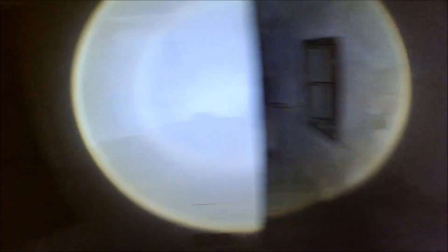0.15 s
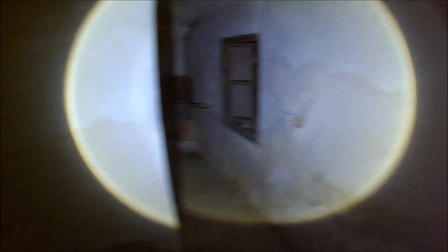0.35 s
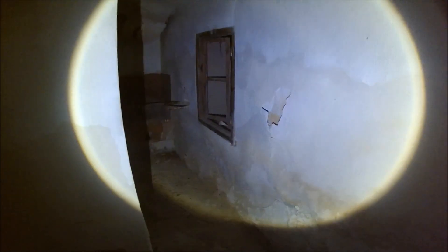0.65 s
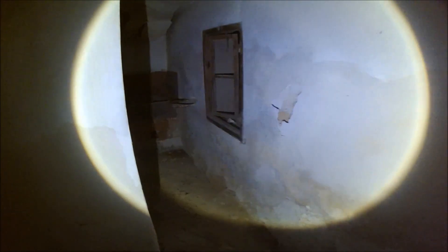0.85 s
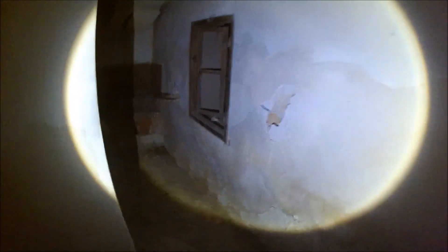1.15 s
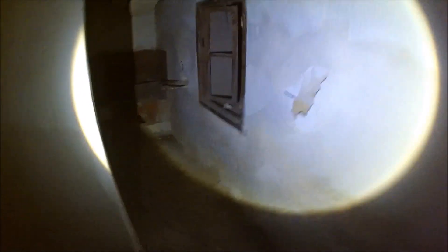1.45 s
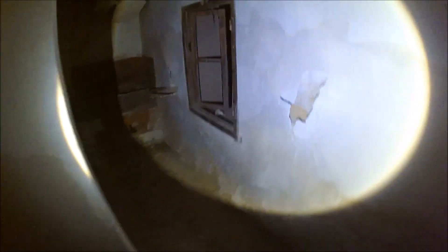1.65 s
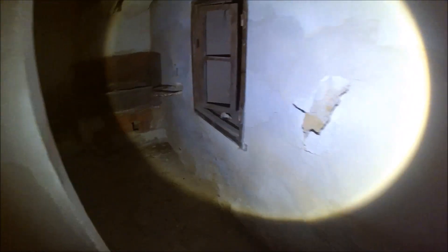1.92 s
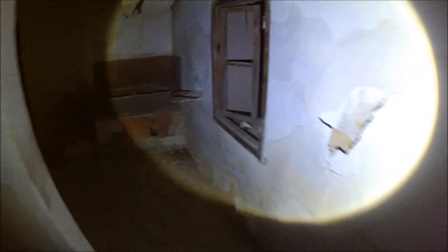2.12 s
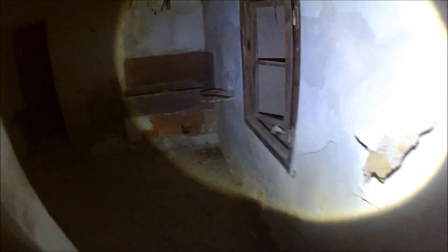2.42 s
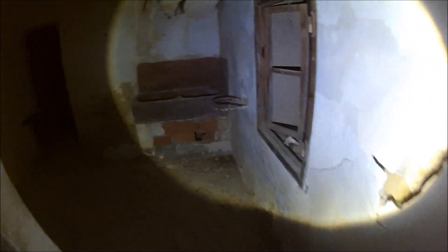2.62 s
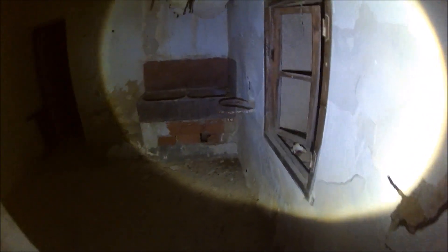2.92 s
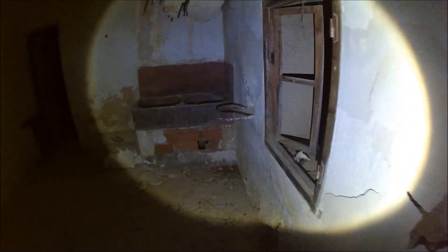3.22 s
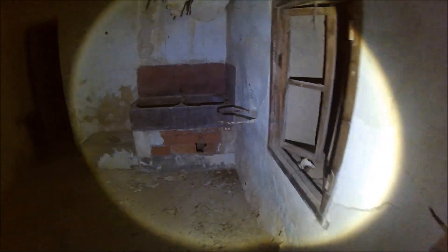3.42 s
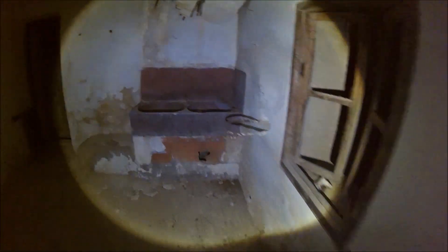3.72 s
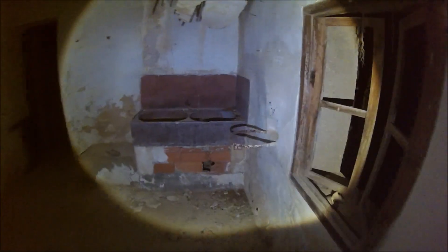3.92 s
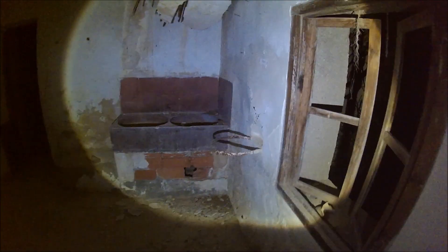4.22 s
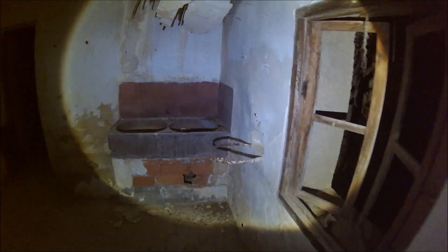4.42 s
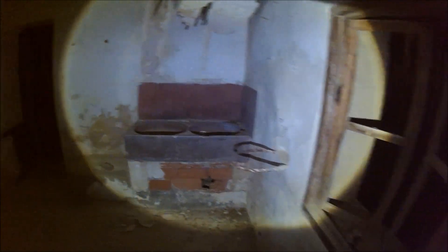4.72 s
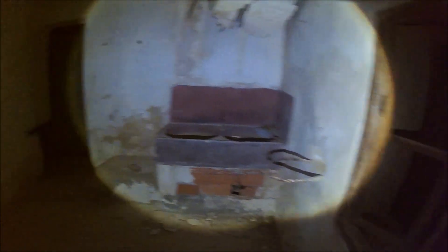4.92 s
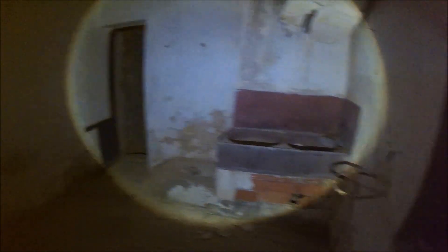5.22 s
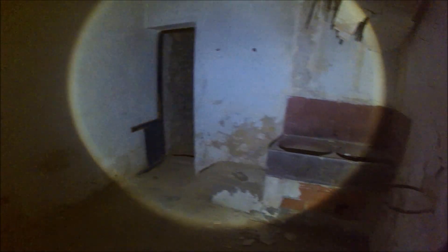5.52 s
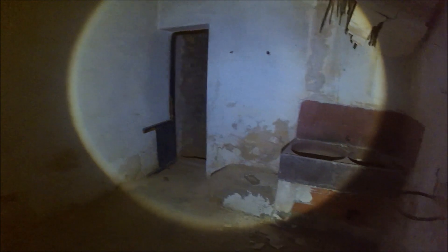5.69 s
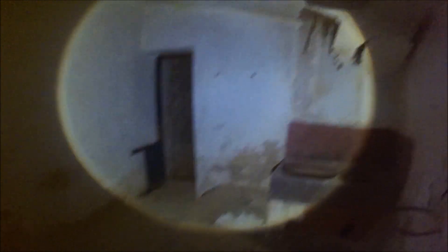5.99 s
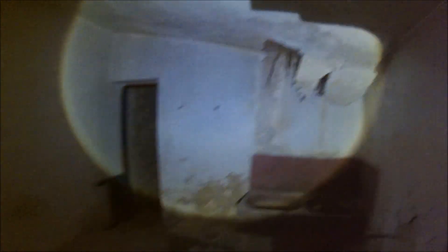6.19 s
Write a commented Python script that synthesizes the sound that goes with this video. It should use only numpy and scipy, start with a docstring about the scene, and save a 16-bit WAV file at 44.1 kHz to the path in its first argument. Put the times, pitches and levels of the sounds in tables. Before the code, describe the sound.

Through a thin nasal microphone, chips snap and grit drags under cautious shoes indoors, after a sharp, close click of handheld plastic.

```python
"""Careful steps over plaster rubble

Someone walks slowly in a small bare room, heard through a thin, nasal microphone.
Chips ring for a few cycles as they snap; grains of filtered noise make the soles drag and crunch.
Dull noise and floor tones make the thuds, and fading random echoes make the walls answer briefly.
Plastic in the hand clicks, loud and dry, and later once more, softly. Faint rustle, hiss and a thin whine lie below."""
import sys
import numpy as np
from scipy import signal
from scipy.fft import rfft, irfft
from scipy.io import wavfile

SR = 44100
rng = np.random.default_rng(int(sys.argv[2]) if len(sys.argv) > 2 else 0)


def inscribe(sig):
    """Save sig as 16-bit PCM at rate SR to the path in sys.argv[1].

    A 1-D sig is mono; a 2-D sig holds one channel per row.
    Samples are clipped to [-1, 1] before scaling.
    """
    pcm = np.round(np.clip(np.atleast_2d(sig).T, -1, 1) * 32767)
    wavfile.write(sys.argv[1], SR, pcm.astype(np.int16))


N = 280035
TIME = np.arange(N) / SR   # seconds

# hiss of the electronics, its tone colour: (frequency [Hz], relative level [dB])
HISS_COLOUR = [(40, 3.5), (500, -15.5), (4500, -8.5), (6000, -18), (7100, -14.5), (8100, -18), (9500, -8),
               (11000, -3), (12500, -6), (14500, -2.5), (16000, -6.5)]
HISS_DB = -85
WHINE_HZ, WHINE_DB = 15714, -98
# microphone behind its small port: (frequency [Hz], gain [dB])
MICROPHONE_RESPONSE = [(40, -38.5), (180, -23), (500, -16), (750, -12), (1080, -8), (1330, 1.03),
                       (1620, -0.2), (1950, 3.5), (2400, -3.5), (2850, -1.5), (3300, -6), (4200, -13.5),
                       (5200, -22), (5900, -42.5), (7200, -40), (8100, -43.5), (10500, -25.5), (15500, -38)]
CUTOFF_HZ = 15900

# how long echoes take to fall by 60 dB: (frequency [Hz], fading time [s])
ROOM_FADING = [(150, 0.58), (1400, 0.37), (3000, 0.19), (10000, 0.27)]
# the first reflections are separate, then they crowd together
ECHOES_PER_S, ECHO_DOUBLING_S = 2800, 0.025

# rustle of clothes and dust as the walker moves, before its swing is reduced: (time [s], level [dB])
RUSTLE_LEVELS = [(0.0, -58.5), (0.41, -62.5), (0.99, -56.5), (1.17, -47.5), (1.33, -46.5), (1.54, -61.5),
                 (1.84, -60.5), (2.03, -51), (2.35, -61), (3.08, -65.5), (3.82, -50.5), (4.17, -66.5),
                 (4.85, -59.5), (5.62, -67.5), (6.07, -64), (6.35, -65.5)]
RUSTLE_REST_DB, RUSTLE_SWING = -65, 0.45   # level between steps; share of the swing that is kept

# weight landing on the floor:
# (time [s], relative rumble level [dB], top of the rumble [Hz], hollow ring gain [dB])
FOOTFALLS = [(0.6606, -52, 600, -33), (.925, -48.5, 400, -66), (1.108, -33, 261, -31),
             (1.37, -67, 400, -44), (1.856, -48, 650, -71), (1.96, -45, 450, -60), (3.584, -37.5, 900, -64),
             (3.725, -50, 960, -62), (4.373, -49, 400, -56), (6.08, -68, 400, -44.5),
             (6.153, -61, 400, -46.5)]
# tones of the hollow floor: (frequency [Hz], level [dB], time to fall by 60 dB [s])
FLOOR_TONES = [(92, -28, 0.39), (179, -20, 0.4), (233, -30, .25), (320, -22, 0.16), (900, 2, 0.029)]
THUD_T60_S = 0.35

# small hard stones tink among the plaster: (time [s], level [dB], pitch [Hz])
STONES = [(.9259, -39.5, 2160), (1.063, -39, 3140), (2.006, -46.5, 4010), (3.2245, -48.5, 2990),
          (3.406, -34.5, 3730), (3.6184, -37.5, 3760)]
TINK_T60_S = 0.019

# hard plastic in the walker's hand clicks: (time [s], strength [dB], hardness of the contact [Hz])
PLASTIC_CLICKS = [(0.757, -29, 2600), (0.7713, 1.5, 18000), (0.7758, -32, 5000), (3.6683, -9, 2350)]
# tones of the plastic: (frequency [Hz], level [dB], time to fall by 60 dB [s])
PLASTIC_TONES = [(560, -11.5, 0.018), (1870, -5.5, 0.0042), (2405, -17.5, 0.0083), (3640, -19.5, 0.014),
                 (4080, -9, 0.005), (7300, -19, 0.007), (10400, -14.5, 0.0058)]

# soles dragging through grit: (time [s], length [s], relative level [dB], brightness [Hz])
DRAGS = [(0.427, 0.019, -54.5, 3200), (.652, .045, -61, 7040), (0.717, 0.07, -58.5, 6100),
         (1.03, 0.05, -58.5, 7900), (1.105, 0.058, -54, 2980), (1.329, 0.048, -46.5, 8800),
         (1.389, 0.021, -56.5, 4250), (1.44, .045, -59, 3050), (1.936, 0.081, -56, 4000),
         (2.178, 0.064, -64.5, 2500), (2.64, 0.049, -55.5, 2570), (3.063, 0.041, -68, 4500),
         (3.37, 0.017, -61, 2480), (3.394, 0.043, -57, 4030), (3.587, 0.038, -64.5, 8850),
         (3.735, 0.042, -59, 4480), (4.371, .14, -68, 2350), (4.687, .07, -62, 1440),
         (5.08, 0.033, -63, 8550), (5.99, 0.24, -69, 1680)]
# resonances of a gritty sole on the floor: (frequency [Hz], width [Hz], level [dB])
SOLE_RESONANCES = [(925, 130, 4), (1600, 1300, -0.5), (2290, 250, -1), (3900, 690, -4.5), (4430, 4600, -11),
                   (12800, 14000, -5.5)]
SCUFF_ATTACK_S, SCUFF_RELEASE_S = 0.0045, 0.0081

# chips giving way under the shoes:
# (time [s], peak of the knock [dB], pitch [Hz], relative strength of the bright crack [dB])
CHIPS = [ (0.4255, -29, 2020, -25), (0.4373, -48, 2060, -21), (0.6605, -32.5, 1390, -25),
         (0.9254, -38.5, 1400, -27), (1.1068, -27.5, 1190, -36), (1.1518, -29, 1290, -25),
         (1.335, -34.5, 1750, -31), (1.3642, -38, 1820, -2), (1.486, -37.5, 1270, -5),
         (1.738, -46.5, 1460, -29), (1.8573, -30, 1510, -1), (1.9463, -28, 2010, -5),
         (2.0643, -28.5, 1550, 5.5), (2.1472, -26.5, 1420, -44), (2.1755, -33, 2150, -8),
         (2.625, -25, 1370, -9), (2.6423, -20, 1300, -11), (2.8497, -41, 1400, -30),
         (2.964, -46.5, 1390, -23), (3.0202, -41.5, 2060, -21), (3.1547, -40.5, 1800, -22),
         (3.1675, -44, 1750, -14), (3.2241, -42, 1940, -12), (3.283, -41, 2100, -33),
         (3.3062, -45, 1880, 12.5), (3.4011, -31, 1470, 0), (3.4053, -36.5, 1570, -2),
         (3.5506, -39.5, 1430, -10), (3.5837, -27.5, 1490, 6), (3.6193, -32.5, 1630, 7.5),
         (3.7218, -24.5, 1550, 4.5), (3.7431, -29.5, 1540, -22), (3.904, -16, 1375, -25),
         (3.9236, -27.5, 1470, -26.5), (4.148, -42.5, 2550, -15), (4.4745, -54, 1820, -17),
         (4.685, -34.5, 1320, -2), (4.7026, -34.5, 1340, -20), (4.8353, -37.5, 1190, 1),
         (5.0808, -43, 2000, -9), (5.7606, -44.5, 1800, 2.5), (6.0284, -43, 1420, -27),
         (6.0813, -49, 1240, -20), (6.1534, -47, 1200, -30)]
TYPICAL_SNAP_DB = -30
SNAP_Q, Q_PER_DB = 2.97, 0.4   # pieces bigger than the typical one are louder and ring more cycles
SNAP_ROOM_DB, DRIER_PER_DB = -3, 0.15   # loud ones lie nearer, so they are drier
# grit crushed after a typical snap, relative level; it follows the snap's size up to the second level
CRUNCH_DB, CRUNCH_MOST_DB = -55.5, -55
CRUNCH_T60_S, CRUNCH_BRIGHT_RATIO = 0.15, 1.2   # its decay; its brightness over the chip's pitch


def from_db(db):
    """Turn decibels into gain."""
    return 10 ** (np.asarray(db) / 20)


def rms_one(x):
    """Scale to an average strength (rms) of 1."""
    return x / np.sqrt(np.mean(x ** 2) + 1e-20)


def at_hz(points, hz):
    """Read a table at any frequency, on a log-frequency axis."""
    known_hz, values = np.transpose(points)
    return np.interp(np.log(np.maximum(hz, 1)), np.log(known_hz), values)


def add(track, s, sound):
    """Mix a sound into a track at time s."""
    start = max(round(s * SR), 0)
    track[start:start + len(sound)] += sound[:N - start]


def low_pass(x, hz, order=2):
    """Keep what lies below hz (Butterworth filter)."""
    return signal.sosfilt(signal.butter(order, min(hz, SR / 2 - 1), fs=SR, output="sos"), x)


def high_pass(x, hz, order=2):
    """Keep what lies above hz (Butterworth filter)."""
    return signal.sosfilt(signal.butter(order, min(hz, SR / 2 - 1), "high", fs=SR, output="sos"), x)


def colour(x, spectrum, size=4096):
    """Give a sound the tone colour of a table, without any sound before its cause (minimum phase)."""
    gain = from_db(at_hz(spectrum, np.fft.rfftfreq(size, 1 / SR)))
    cepstrum = irfft(np.log(gain))
    # folding the second half onto the first makes the filter respond as early as it can
    cepstrum[1:size // 2] *= 2
    cepstrum[size // 2 + 1:] = 0
    response = irfft(np.exp(rfft(cepstrum, size)))
    return signal.fftconvolve(x, response)[:len(x)]


def dying(t, t60):
    """Fade exponentially, 60 dB down after t60."""
    return from_db(-60 * t / t60)


def wavering(length, per_s):
    """Draw a random curve of spread about 1 that takes per_s new values a second."""
    return np.interp(TIME[:length] * per_s, np.arange(SR), rng.standard_normal(SR))


def grit(length, per_s, spread_db):
    """Tiny grains break at random moments; spread_db sets how unequal they are; rms 1."""
    sizes = from_db(spread_db * np.minimum(rng.exponential(1, length), 4))
    breaks = rng.random(length) < per_s / SR
    return rms_one(sizes * rng.standard_normal(length) * breaks)


def hiss():
    """The electronics make steady random noise with a tone colour of its own."""
    return from_db(HISS_DB) * rms_one(colour(rng.standard_normal(N), HISS_COLOUR))


def whine():
    """The electronics also leak one thin, very high, steady tone."""
    return from_db(WHINE_DB) * np.sin(2 * np.pi * WHINE_HZ * TIME)


def walls(first_echo_s=0.00018, count=8):
    """Echoes from one spot of the room, of energy 1: ever denser reflections, each band fading at its own pace."""
    t = TIME[:SR // 2]
    density = np.minimum(ECHOES_PER_S * 2 ** (t / ECHO_DOUBLING_S) / SR, 1)
    arrivals = rng.random(len(t)) < density
    echoes = rng.standard_normal(len(t)) * arrivals / np.sqrt(density)
    hz, spectrum = np.fft.rfftfreq(len(t), 1 / SR), rfft(echoes)
    centres, tail = np.geomspace(150, 12000, count), 0
    # each row of np.eye picks out one frequency band, overlapping its neighbours
    for centre, share in zip(centres, np.eye(count)):
        band = irfft(spectrum * at_hz(np.c_[centres, share], hz), len(t))
        tail = tail + band * dying(t, at_hz(ROOM_FADING, centre))
    tail = tail * np.clip(t / first_echo_s - 0.5, 0, 1)
    return tail / np.sqrt(np.sum(tail ** 2))


def with_room(sound, room_db):
    """A whole track is heard directly and through the echoes of one spot."""
    return sound + from_db(room_db) * signal.fftconvolve(sound, walls())[:N]


def rustle(grains_per_s=14000, spread_db=0.0, top_hz=3600, gain_db=10, flutter_db=1.5, flutter_per_s=22):
    """Soft, fine rubbing that wavers with the walker's movement."""
    swing_db = RUSTLE_SWING * (np.interp(TIME, *np.transpose(RUSTLE_LEVELS)) - RUSTLE_REST_DB)
    level_db = RUSTLE_REST_DB + swing_db + flutter_db * wavering(N, flutter_per_s)
    return from_db(level_db + gain_db) * low_pass(grit(N, grains_per_s, spread_db), top_hz)


def thuds(bass_share=0.27, hollow_rise_s=0.0014):
    """The floor takes the weight with a dull, dying rumble, and rings where it is hollow."""
    out, t = np.zeros(N), TIME[:SR // 2]
    ring = sum(from_db(db) * dying(t, t60) * np.sin(2 * np.pi * hz * t) for hz, db, t60 in FLOOR_TONES)
    ring = (1 - np.exp(-t / hollow_rise_s)) * ring
    for s, rumble_db, top_hz, ring_db in FOOTFALLS:
        noise = low_pass(rng.standard_normal(len(t)), top_hz)
        rumble = rms_one(high_pass(noise, bass_share * top_hz))
        # a third, to leave room for the peaks of the noise
        add(out, s, rumble * from_db(rumble_db) * dying(t, THUD_T60_S) / 3)
        add(out, s, from_db(ring_db) * ring)
    return out


def tinks(room_db=-4):
    """Stone against stone gives a clear, quickly fading tone."""
    out, t = np.zeros(N), TIME[:SR // 10]
    for s, level_db, pitch_hz in STONES:
        tone = np.sin(2 * np.pi * pitch_hz * t)
        add(out, s, from_db(level_db) * dying(t, TINK_T60_S) * tone)
    return with_room(out, room_db)


def plastic_clicks(room_db=-30, contact_s=0.00005, low_hz=1150):
    """Hard plastic clicks right beside the microphone, almost dry; a soft contact leaves out the high tones."""
    out, t = np.zeros(N), TIME[:SR // 20]
    click = sum(from_db(db) * dying(t, t60) * np.cos(2 * np.pi * hz * t) for hz, db, t60 in PLASTIC_TONES)
    click = high_pass(click * (1 - np.exp(-t / contact_s)), low_hz, order=4)
    for s, strength_db, hard_hz in PLASTIC_CLICKS:
        add(out, s, from_db(strength_db) * low_pass(click, hard_hz, order=6))
    return with_room(out, room_db)


def strokes():
    """Pressure on the grit as (s, envelope, brightness Hz): held through a drag, dying away after a snap."""
    t = TIME[:SR // 2]
    attack = np.minimum(t / SCUFF_ATTACK_S, 1)
    for s, length_s, level_db, bright_hz in DRAGS:
        release = np.clip(1 - (t - length_s) / SCUFF_RELEASE_S, 0, 1)
        yield s, from_db(level_db) * attack * release, bright_hz
    for s, peak_db, pitch_hz, _ in CHIPS:
        level_db = min(CRUNCH_DB + peak_db - TYPICAL_SNAP_DB, CRUNCH_MOST_DB)
        yield s, from_db(level_db) * attack * dying(t, CRUNCH_T60_S), CRUNCH_BRIGHT_RATIO * pitch_hz


def scuffs(grains_per_s=4500, spread_db=-0.6, gain_db=13.5, room_db=-10, plain_db=-11, bass_share=0.21):
    """A shoe crushes grains in quick clumps, which excite the sole's resonances; brighter grit is also thinner."""
    grains = np.zeros(N)
    for s, pressure, bright_hz in strokes():
        clumps = from_db(3 * wavering(len(pressure), 300) - 1)
        stream = pressure * clumps * grit(len(pressure), grains_per_s, spread_db)
        stream = low_pass(stream, bright_hz, order=1)
        add(grains, s, high_pass(stream, bass_share * bright_hz))
    out = from_db(plain_db) * grains
    for hz, width_hz, db in SOLE_RESONANCES:
        out = out + from_db(db) * signal.lfilter(*signal.iirpeak(hz, hz / width_hz, fs=SR), grains)
    return from_db(gain_db) * with_room(out, room_db)


def fracture(decay_s=0.009, grains_per_s=9000, low_hz=2400, sparkle_db=-2, sparkle_hz=9000, size=1024):
    """A crack runs through a chip as a few milliseconds of bright micro-snaps."""
    burst = grit(size, grains_per_s, 2) * dying(TIME[:size], decay_s)
    burst = high_pass(burst, low_hz, order=1)
    burst = burst / np.sqrt(np.sum(burst ** 2))
    return burst + from_db(sparkle_db) * high_pass(burst, sparkle_hz)


def chip(pitch_hz, q, crack_db, contact_ratio=0.88, crack_gain_db=10, bed_ratio=1.29, q_share=0.5, size=1024):
    """A short contact sets a chip ringing for a few cycles, peak 1; a fracture adds a sharp crack."""
    ring = signal.unit_impulse(size)
    # chip and rubble bed resonate in series and share the Q: the knock swells over a cycle and dies fast
    for hz in (pitch_hz / bed_ratio ** 0.5, pitch_hz * bed_ratio ** 0.5):
        ring = signal.lfilter(*signal.iirpeak(hz, max(q_share * q, 0.5), fs=SR), ring)
    ring = low_pass(ring, contact_ratio * pitch_hz, order=1)
    return ring / np.abs(ring).max() + from_db(crack_db + crack_gain_db) * fracture()


def crumbs(per_s=70, above_scuff_db=18, spread_db=5.5, room_db=-8, q=2.7, count=24):
    """Coarser crumbs burst at random under a dragging sole, louder when it presses harder."""
    out = np.zeros(N)
    for s, length_s, level_db, _ in DRAGS:
        draws = rng.random((count, 3))
        delays = np.cumsum(2 * draws[:, 0]) / per_s
        for delay, (_, pitch, size) in zip(delays, draws):
            crumb = chip(1250 * 2 ** pitch, q, -20.5)   # pitches within one octave
            crumb_db = level_db + above_scuff_db + spread_db * (2 * size - 1.5)
            if delay < length_s:
                add(out, s + delay, from_db(crumb_db) * crumb)
    return with_room(out, room_db)


def snaps():
    """Chips snap and knock; each lies at another spot, so each has echoes of its own."""
    out = np.zeros(N)
    for s, peak_db, pitch_hz, crack_db in CHIPS:
        size_db = peak_db - TYPICAL_SNAP_DB
        q = SNAP_Q + Q_PER_DB * max(size_db, 0)
        sound = from_db(peak_db) * chip(pitch_hz, q, crack_db)
        room_db = SNAP_ROOM_DB - DRIER_PER_DB * size_db
        add(out, s, sound)
        add(out, s, from_db(room_db) * signal.fftconvolve(sound, walls()))
    return out


def scene():
    """Add up all that the feet and the walker stir up."""
    return (rustle() + thuds() + tinks() + plastic_clicks() + scuffs() + crumbs() + snaps())[None]


def record(dry):
    """The port favours 1-3 kHz; the electronics add hiss and a thin whine; the top is cut."""
    sound = colour(dry[0], MICROPHONE_RESPONSE) + hiss() + whine()
    steep_cut = signal.ellip(10, 0.5, 70, CUTOFF_HZ, fs=SR, output="sos")
    return signal.sosfilt(steep_cut, sound)[None]


dry = scene()
out = record(dry)
inscribe(out)
```